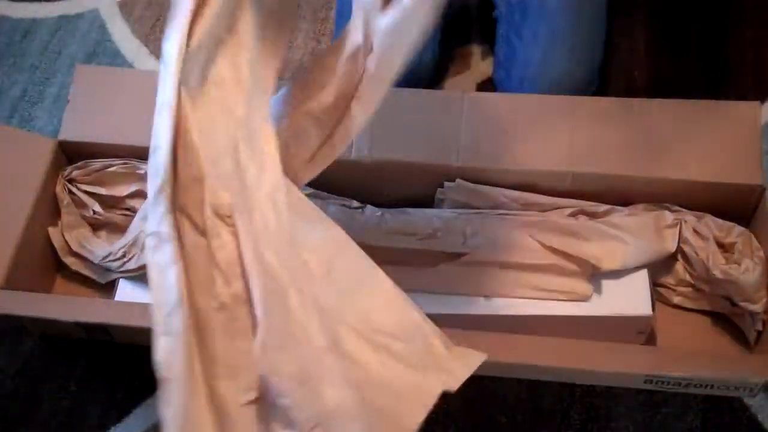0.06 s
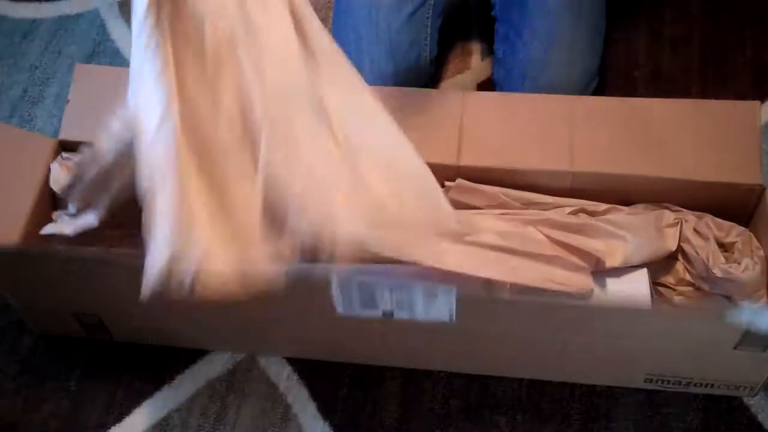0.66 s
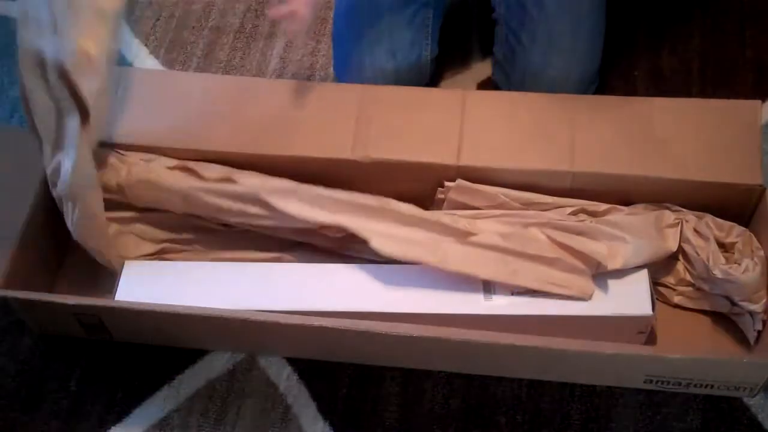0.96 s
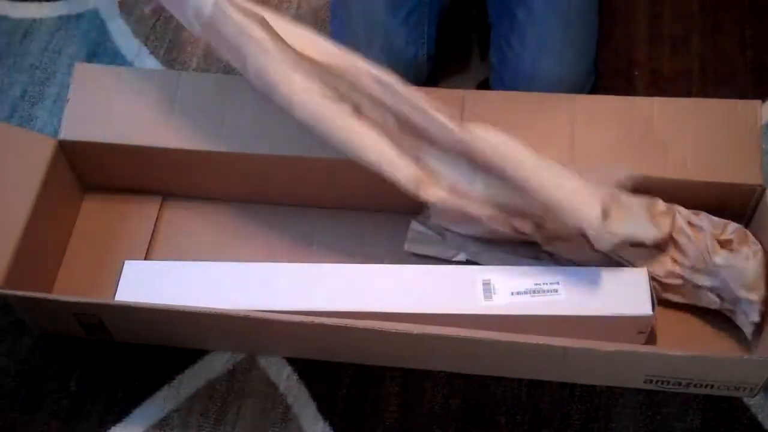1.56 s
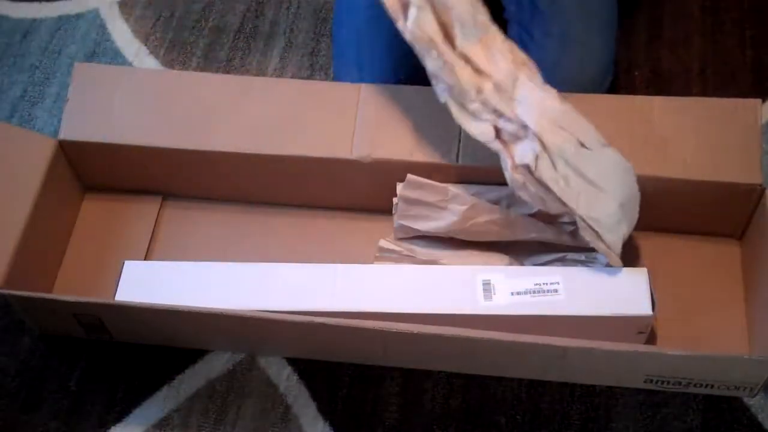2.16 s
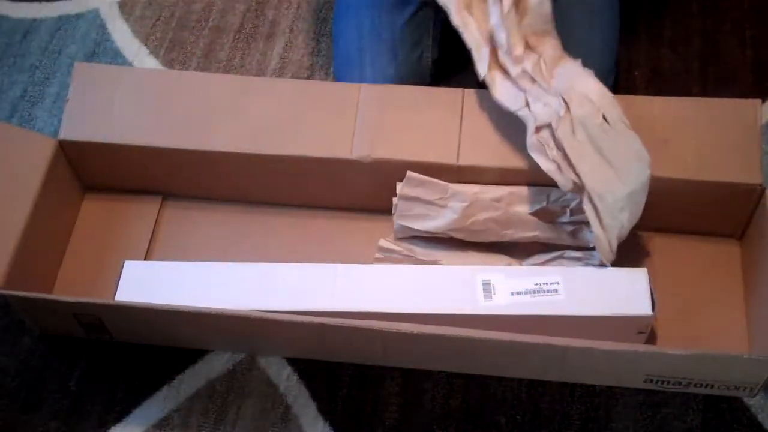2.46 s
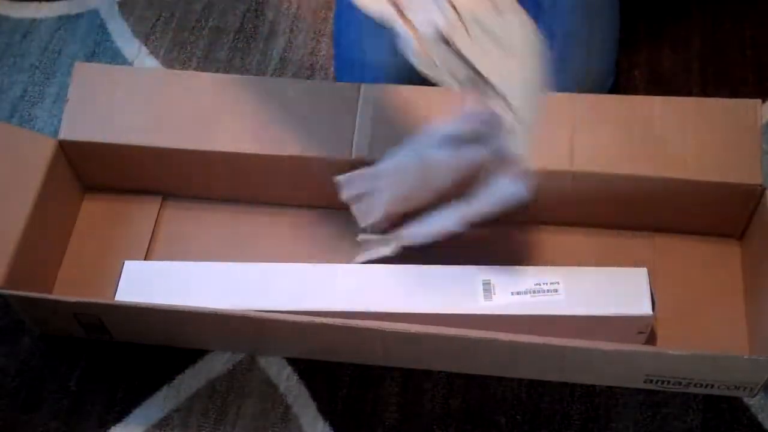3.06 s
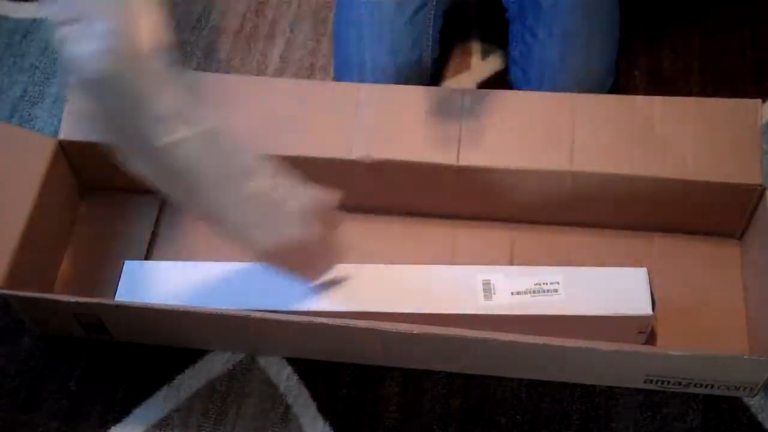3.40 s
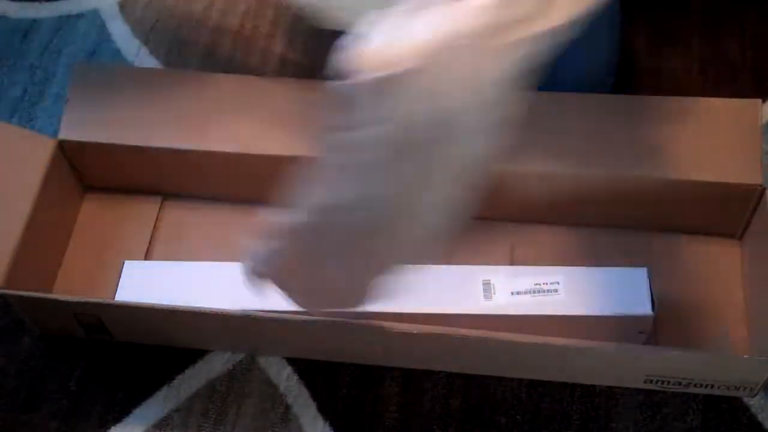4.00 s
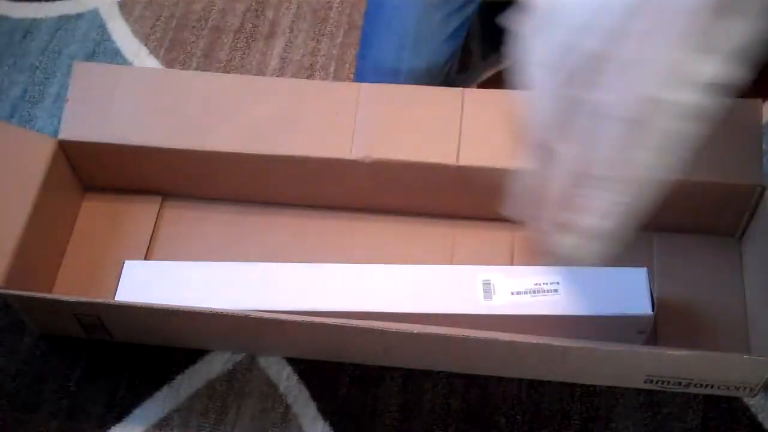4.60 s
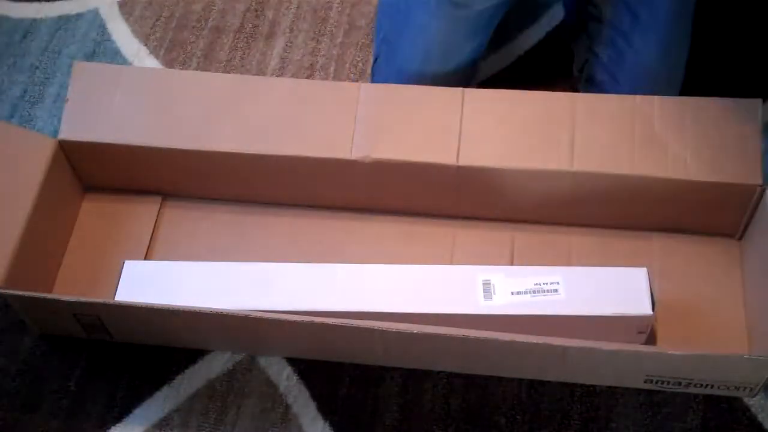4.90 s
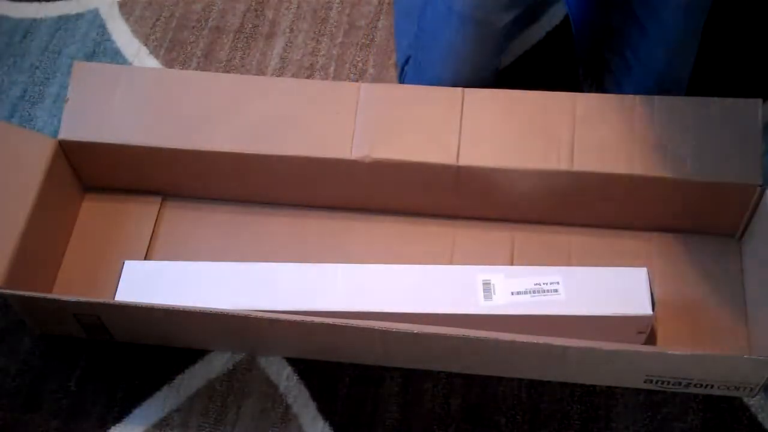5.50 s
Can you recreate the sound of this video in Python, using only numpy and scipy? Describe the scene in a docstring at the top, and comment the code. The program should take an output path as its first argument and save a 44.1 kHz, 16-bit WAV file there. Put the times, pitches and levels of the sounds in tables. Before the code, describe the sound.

Crumpled packing paper is pulled out of a cardboard box in uneven handfuls, crinkling brightly with sharp snaps and a sliding hiss. Now and then it scrapes the cardboard with a faint hollow sound. After about four seconds the strip swings free and goes nearly quiet, with a few soft pats, then is bunched up again in a last burst of crackling. The microphone is close, in a small room.

```python
"""Crumpled packing paper is hauled out of a cardboard box, handful after handful, in a small room.
Its creases buckle in runs of tiny pops and a few sharp snaps; the sheet hisses by friction, its
broad folds flutter, and its scrapes drive the panel modes of the box. The long strip swings free and
almost falls silent, then is bunched up again. Two close microphones listen from above."""
import sys
import numpy as np
from scipy import signal
from scipy.fft import rfft, irfft
from scipy.io import wavfile
from scipy.ndimage import uniform_filter1d, minimum_filter1d

SR = 44100
rng = np.random.default_rng(int(sys.argv[2]) if len(sys.argv) > 2 else 0)


def store_wav(level_fs):
    """Save 16-bit WAV to argv[1]."""
    pcm = np.round(np.clip(np.atleast_2d(level_fs), -1, 1) * 32767)
    wavfile.write(sys.argv[1], SR, pcm.T.astype(np.int16))


N = 244666
TIME = np.arange(N) / SR
MIC_SPACING_M, SOUND_SPEED_M_S = 0.054, 343


def crinkle(crush_db):
    """Buckling avalanches: small creases pop amid a fizz of fibres, more unevenly under hard crushing."""
    # Each row: frequency in Hz, spectral level in dB.
    spectrum = [(150, -28), (500, -27), (1200, -10), (2500, -5), (5000, -2), (9000, 0.5), (14000, -0.5)]
    grains = pops(low_hz=965, high_hz=13920, cycles=1.73, spread_db=3.0, count=20000, size=96)
    fizz = amp(-5.5) * diffuse(N)
    vigour = np.clip((crush_db + 50.0) / 24, .1, 1.2)
    avalanches = unit(amp(2.1 * vigour * wander(60)))
    return colour((grains + fizz) * avalanches * amp(crush_db - 1.85), spectrum)


def pops(low_hz, high_hz, cycles, spread_db, count, size):
    """Damped oscillators: each facet of paper flips and rings with its own pitch, size and direction."""
    when, pitch, rank, side, sign = rng.random((count, 5)).T[:, :, None]
    samples = (when * (N - size)).astype(int) + np.arange(size)
    hz = low_hz + (high_hz - low_hz) * pitch
    spread = spread_db * (hz / high_hz) ** 0.25  # tight creases differ most in strength
    height = amp(-spread * np.log(rank + 1 / 200)) * np.sign(sign - .5) * hz ** 0.39
    lag = 0.64 * (side - .5) * MIC_SPACING_M / SOUND_SPEED_M_S / 2  # the paper lies roughly ahead
    channels = []
    for delay in (lag, -lag):
        turns = hz * np.maximum((np.arange(size) - 2) / SR - delay, 0)
        ring = height * np.exp(-turns / cycles) * np.sin(2 * np.pi * turns)
        channels.append(np.bincount(samples.ravel(), ring.ravel(), N))
    return unit(np.array(channels))


def snaps(crush_db):
    """Snap-through: a stiff crease gives way, the larger the longer, and shakes its neighbours loose."""
    # Each row: start in seconds, relative strength in dB, following run of pops in dB relative
    # to the snap, brightness in dB per octave.
    creases = [(0.011, -8, -26, 4), (0.1942, -12, -15, 2), (0.226, -14, -15, 8), (0.5858, -14, -9.5, -3),
               (0.822, -19, -5, 0), (0.8965, -14, -12, -2.5), (0.918, -19, -5, -3), (0.9519, -14, -12, 8),
               (1.0496, -17, -8, 1), (1.3524, -12, -8, -1), (1.4044, -12.5, -11, 3),
               (1.6846, -11.5, -3.5, -1.5), (2.045, -6, -18, -1.5), (2.469, -13, -9, -5),
               (2.53, -11, -10, -1), (2.6585, -14.5, -7.5, -5.5), (2.7234, -11, -19, -4),
               (3.0057, -13, -16, 3), (3.0536, -20, -3, -3.5), (3.177, -13.5, -8, -2.5),
               (3.2165, -17, -11, 3), (3.2535, -16, -22, 16), (3.4274, -15.5, -21, 7),
               (3.5495, -15, -23, 1), (3.631, -11.5, -19, 2), (3.7813, -16, -11, -3),
               (3.8728, -7.5, -12.5, -0.5), (4.0471, -19, -6.5, -3), (4.2131, -24.5, -6, -1),
               (4.2806, -26.5, -2.5, -4), (4.4576, -20.5, -8.5, -2), (4.541, -22, -7, 0),
               (4.7575, -26, -4, -3.5), (4.8323, -34, -4, 0), (4.871, -17.5, -3, -3.5),
               (5.1673, -18, -12, 13), (5.233, -14.5, -22, 12)]
    # Each row: frequency in Hz, spectral level in dB.
    spectrum = [(100, -34), (400, -16), (1200, -7.5), (3000, -0.5), (5500, 1.5), (8000, 4.5), (14000, 1)]
    out, t = np.zeros((2, N)), np.arange(2048) / SR
    hz = np.fft.rfftfreq(len(t), 1 / SR)
    octaves = np.log2(np.clip(hz, 1500, 12000) / 6000)
    for start, db, run_db, tilt_db in creases + lesser_creases(crush_db):
        fibres, neighbours = rng.standard_normal((2, len(t)))
        travel_s = .00045 * amp(.25 * (db + 20))
        crack = np.sign(fibres) * np.sqrt(t / travel_s) * np.exp(-t / travel_s)
        run_envelope = np.exp(-t / 0.0072) * (1 - np.exp(-t / travel_s))
        run = amp(run_db - 4.5) * unit(neighbours * abs(neighbours)) * run_envelope
        # tight creases sound thin and high, slack ones fuller
        tilted = rfft(np.roll(crack + run, 4)) * amp(tilt_db * octaves)
        lag = 0.28 * rng.uniform(-0.41, 0.3) * MIC_SPACING_M / SOUND_SPEED_M_S / 2
        pair = irfft(tilted * np.exp(1j * np.pi * hz * np.array([[lag], [-lag]])))
        add(out, start, amp(db + 12.5) * pair)
    return colour(out, spectrum)


def lesser_creases(crush_db, count=50, spread_db=1.5, run_db=-14, tilt_spread_db=7):
    """Random buckling: further rows for snaps(), as strong as the crushing at that moment allows."""
    when, size, brightness = rng.random((count, 3)).T
    start = (np.arange(count) + when) / count * N / SR
    db = np.interp(start, TIME, crush_db) - 2.5 + spread_db * (2 * size - 1)
    tilt_db = tilt_spread_db * (2 * brightness - 1)
    return list(zip(start, db, np.full(count, run_db), tilt_db))


def handling(grip_s=0.0049, relax_s=0.0074, crunch_flex_db=-21.5):
    """Incoherent sources add in power: haul plus handfuls give crushing, sliding and flexing in dB."""
    # Each row: time in seconds, crushing in dB, then sliding and flexing in dB relative to crushing.
    haul = [(0, -19, -4, -21), (.33, -24.5, -2.5, -12.5), (.55, -23.5, -5, -16), (.97, -23.5, -5, -20),
            (1.28, -20, -6, -15.5), (1.85, -20, -5, -15.5), (2.19, -23.5, -3, -14.5), (2.62, -24.5, 1, -14),
            (3.0, -21, -3.5, -18), (3.24, -27.5, -3, -17.5), (3.39, -37, -1, -13.5), (3.72, -23.5, -7, -21),
            (4.08, -30, -2.5, -16.5), (4.36, -45.5, 2, -10), (4.84, -45, 2, -8), (4.9, -24, -3.5, -15),
            (5.33, -24.5, -4, -17), (5.55, -18.5, -0.5, -15.5)]
    # Each row: start and length in seconds, crushing in dB, sliding in dB relative to crushing.
    crunches = [(0, 0.011, -20, -2), (0.076, 0.04, -19, -13), (.16, .11, -17.5, -9),
                (0.348, 0.068, -20.5, -6.5), (0.635, 0.024, -17, -7), (0.703, 0.025, -23, -3),
                (0.816, .03, -22, -14), (1.04, 0.052, -21, -5), (1.196, 0.06, -21.5, -4.5),
                (1.277, 0.03, -19.5, -1), (1.475, 0.052, -19, -3), (1.547, 0.043, -17, -6.5),
                (1.675, 0.053, -24.5, 2), (1.82, 0.039, -20, -3.5), (2.261, 0.095, -18.5, -3.5),
                (2.459, 0.09, -20, -7.5), (2.986, 0.079, -19.5, -17), (3.161, 0.1, -26.5, -3),
                (3.42, 0.037, -28.5, -1.5), (3.475, 0.069, -21.5, -6.5), (3.575, 0.18, -22, -5),
                (3.708, 0.13, -24.5, -3), (3.951, 0.14, -27, -1.5), (4.208, 0.018, -34, -6),
                (4.281, 0.029, -32.5, -3), (4.459, 0.15, -37, -0.5), (4.862, .055, -17, -7),
                (5.065, 0.099, -23, -3.5), (5.164, 0.075, -24, 0.5), (5.37, 0.065, -23.5, -6)]
    times, *columns = np.transpose(haul)
    crush_db, slide_db, flex_db = (np.interp(TIME, times, column) for column in columns)
    power = amp([crush_db, crush_db + slide_db, crush_db + flex_db]) ** 2
    for start, length, db, sliding_db in crunches:
        age = TIME - start
        envelope = np.clip(age / grip_s, 0, 1) * np.exp(-np.maximum(age - length, 0) / relax_s)
        power += (amp([[db], [db + sliding_db], [db + crunch_flex_db]]) * envelope) ** 2
    return 10 * np.log10(power)


def slide(slide_db):
    """Sliding friction: paper hisses over paper and cardboard while its larger facets knock."""
    # Each row: frequency in Hz, spectral level in dB.
    spectrum = [(100, -42), (250, -30.5), (450, -6.5), (750, -2.5), (1200, -2.5), (2200, -2), (4000, -2),
                (8000, -7.5), (14000, -8)]
    knocks = pops(low_hz=402, high_hz=6050, cycles=1.16, spread_db=1.5, count=11000, size=192)
    friction = unit(knocks + amp(-1.0) * diffuse(N))
    return colour(friction * amp(slide_db - 3.5 + 0.35 * wander(60)), spectrum)


def flex(flex_db):
    """Flexural motion: broad folds bend with a low, hollow flutter."""
    # Each row: frequency in Hz, spectral level in dB.
    spectrum = [(30, -44), (100, -14), (170, -7), (240, 2.5), (400, 2.5), (600, 3), (1200, -19.5),
                (4000, -46)]
    return colour(diffuse(N) * amp(flex_db - 4 + 0.83 * wander(41)), spectrum)


def rub():
    """Cavity resonance: the hollow of the box colours the stutter of the wad along its inside."""
    # Each row: time in seconds, relative level in dB.
    levels = [(2.1, -56), (2.3, -31), (2.43, -30), (2.54, -25), (2.68, -36), (2.82, -22.5), (2.95, -61),
              (3.05, -41), (3.25, -60)]
    # Each row: frequency in Hz, spectral level in dB.
    hollow = [(200, -39), (450, -20), (720, -4), (950, -6.5), (1400, -10), (3000, -26)]
    level_db = np.interp(TIME, *np.transpose(levels), left=-100, right=-100)
    return colour(diffuse(N) * amp(level_db - 5.5 + 1.7 * wander(40)), hollow)


def flaps():
    """Damped impacts: the free end of the strip slaps against itself with short, dull pats."""
    # Each row: start in seconds, strength in dB, decay time in seconds.
    slaps = [(4.213, -35, 0.016), (4.394, -29, 0.013), (4.487, -30, 0.0058), (4.699, -32.5, 0.013),
             (4.832, -26.5, 0.0087)]
    # Each row: frequency in Hz, spectral level in dB.
    spectrum = [(200, -20), (600, -13), (1050, 2.5), (1500, -9), (2100, -3.5), (3500, -6), (8000, -16.5)]
    out, t = np.zeros((2, N)), np.arange(4096) / SR
    for start, db, decay in slaps:
        add(out, start, amp(db) * diffuse(len(t)) * np.exp(-t / decay))
    return colour(out, spectrum)


def box():
    """Forced vibration: paper catches on the walls and sets the cardboard panel modes drumming."""
    # Each row: frequency in Hz, bandwidth in Hz, relative level in dB.
    modes = [(255, 18, -0.5), (350, 53, -7.5), (450, 48, -2.5), (940, 120, -21), (1265, 120, -9)]
    # Each row: start in seconds, relative strength in dB, length in seconds.
    scrapes = [(0.184, -32, 0.025), (0.716, -27.5, 0.061), (0.774, -46, 0.024), (0.822, -33, 0.022),
               (1.069, -39, 0.039), (1.51, -31.5, .03), (2.03, -32.5, 0.083), (2.29, -33.5, .06),
               (2.61, -37, 0.058), (3.724, -39.5, 0.04), (5.174, -30.5, 0.067)]
    out, t = np.zeros((2, N)), np.arange(8192) / SR
    panel = sum(amp(db) * width * np.exp(-np.pi * width * t) * np.cos(2 * np.pi * hz * t)
                for hz, width, db in modes)
    no_bass = signal.butter(3, 170, "highpass", fs=SR, output="sos")  # light panels radiate little bass
    for start, db, length in scrapes:
        scrape = signal.sosfilt(no_bass, rng.standard_normal(len(t)) * np.exp(-(t / length) ** 4))
        drum = unit(signal.fftconvolve(scrape, panel)[:len(t)]) * np.sqrt(length / t[-1])
        add(out, start, amp(db - 3.0) * np.array([drum, drum]))
    return out


def puffs():
    """Air displacement: the squeezed wad pushes out soft, low puffs."""
    # Each row: start in seconds, relative level in dB, length in seconds.
    squeezes = [(0.195, -54, 0.075), (4.879, -50, 0.1), (5.05, -58, 0.41), (5.51, -39, .08)]
    out, t = np.zeros((2, N)), np.arange(16384) / SR
    band = signal.butter(2, [70, 170], "bandpass", fs=SR, output="sos")
    for start, db, length in squeezes:
        puff = unit(signal.sosfilt(band, diffuse(len(t))))
        swell = np.sin(np.pi * np.minimum(t / length, 1))
        add(out, start, amp(db + 9.5) * puff * swell)
    return out


def room(x, wet_db, parts=8):
    """Reverberation: box, floor and walls give each part of the long strip its own echo pattern."""
    # Each row: frequency in Hz, time to decay by 60 dB in seconds.
    decay_times = [(150, 0.18), (800, 0.37), (2500, 0.28), (7000, 0.27), (14000, 0.15)]
    out = np.zeros((2, N))
    sounding_part = np.repeat(rng.integers(0, parts, N // 128 + 1), 128)[:N]
    for part in range(parts):
        hz, t, spectra = signal.stft(diffuse(size=22050), SR, nperseg=256)
        decay = amp(-60 * t / read(decay_times, hz)[:, None])
        tail = signal.istft(spectra * decay, SR, nperseg=256)[1]
        tail *= np.clip(np.arange(tail.shape[1]) / SR / 0.0011 - 1, 0, 1)  # echoes start after 1.1 ms
        share = np.sin(np.pi / 2 * uniform_filter1d(1. * (sounding_part == part), 128))
        out += signal.oaconvolve(x[:1] * share, tail / np.linalg.norm(tail[0]), axes=1)[:, :N]
    no_bass = signal.butter(3, 200, "highpass", fs=SR, output="sos")
    return amp(wet_db) * signal.sosfilt(no_bass, out)


def background():
    """Noise floor: the diffuse quiet of the room and a faint, independent rumble in each port."""
    # Each row: frequency in Hz, spectral level in dB.
    quiet = [(20, -4), (70, -13), (150, 29), (500, -13), (2000, -20), (14000, -30)]
    rumble = colour(rng.standard_normal((2, N)), [(40, -3), (90, -4), (300, -11), (2000, -60)])
    return amp(-67.5) * colour(diffuse(N), quiet) + amp(-60.0) * rumble


def diffuse(size):
    """Diffuse-field noise: alike at both microphones in the bass, unrelated in the treble."""
    common, separate = rfft(rng.standard_normal((2, size)))
    coherence = np.sinc(2 * np.fft.rfftfreq(size, 1 / SR) * MIC_SPACING_M / SOUND_SPEED_M_S)
    right = coherence * common + np.sqrt(1 - coherence ** 2) * separate
    return irfft(np.array([common, right]), size)


def wander(hz):
    """Random modulation: a curve of rms one that fluctuates mostly near the given rate."""
    ratio = np.fft.rfftfreq(N, 1 / SR) / hz
    return unit(irfft(rfft(rng.standard_normal(N)) * ratio / (1 + ratio ** 3), N))


def colour(x, points):
    """Unit-energy filtering: white sound takes on a spectrum and keeps its power."""
    taps = response(points)
    return signal.oaconvolve(x, taps[None] / np.linalg.norm(taps), axes=1)[:, :N]


def response(points, size=2048):
    """Minimum phase: the causal impulse response of a spectrum."""
    hz = abs(np.fft.fftfreq(size, 1 / SR))
    log_gain = np.log(amp(read(points, hz)))
    return np.fft.ifft(np.exp(np.conj(signal.hilbert(log_gain)))).real[:size // 2]


def read(points, hz):
    """Interpolation of a table on a log-frequency axis."""
    table_hz, values = np.transpose(points)
    return np.interp(np.log(hz + 1), np.log(table_hz), values)


def add(mix, start_s, sound):
    """Superposition: a stereo sound joins the mix at a given time."""
    part = mix[:, max(round(start_s * SR), 0):][:, :sound.shape[1]]
    part += sound[:, :part.shape[1]]


def amp(db):
    """Decibels as an amplitude ratio."""
    return 10 ** (np.asarray(db) / 20)


def unit(x):
    """Normalisation to an rms of one."""
    return x / np.sqrt(np.mean(x ** 2) + 1e-20)


def scene():
    """Direct and reverberant sound: creases crack close by, the sliding sheet lies farther off."""
    crush_db, slide_db, flex_db = handling()
    near = crinkle(crush_db) + snaps(crush_db)
    far = slide(slide_db) + rub() + flaps()
    body = amp(5) * (flex(flex_db) + box())
    echoes = room(near + amp(1.0) * far, wet_db=-2.0)
    return near + far + body + echoes + background() + puffs()


def record(dry, left_delay_s=.00004, ceiling=.95, cutoff_hz=14300):
    """Port resonance: each microphone rings at its own pitch; a limiter and a low-pass follow."""
    # Each row: frequency in Hz, gain of the port in dB.
    left_port = [(100, -12), (1100, -0.46), (2500, 0.8), (4600, 0), (6300, 2.5), (7100, 4.5), (7600, 8),
                 (8050, 7.5), (8700, 0.5), (9900, -6), (12500, -13), (14200, -12)]
    right_port = [(100, -8.5), (1100, 1.74), (2500, 1.84), (4600, 0.95), (5900, 4), (6650, 7), (7400, 1),
                  (8700, -7.5), (10000, -14.5), (12000, -25), (14200, -28.5)]
    ports = np.array([response(left_port), response(right_port)])
    heard = signal.oaconvolve(dry, ports, axes=1)[:, :N]
    delay = np.exp(-2j * np.pi * np.fft.rfftfreq(N, 1 / SR) * np.array([[left_delay_s], [0]]))
    heard = irfft(rfft(heard) * delay, N)
    allowed_gain = ceiling / np.maximum(abs(heard), ceiling)
    limiter = uniform_filter1d(minimum_filter1d(allowed_gain, size=49), size=49)
    low_pass = signal.firwin(1023, cutoff_hz, window=("kaiser", 9), fs=SR)
    return signal.oaconvolve(heard * limiter, low_pass[None], "same")


dry = scene()
out = record(dry)
store_wav(out)
```